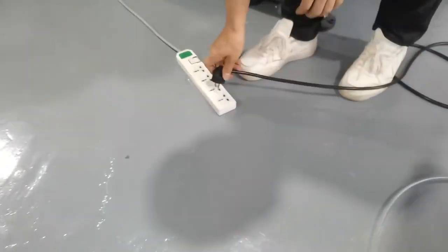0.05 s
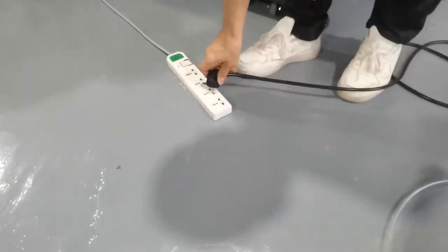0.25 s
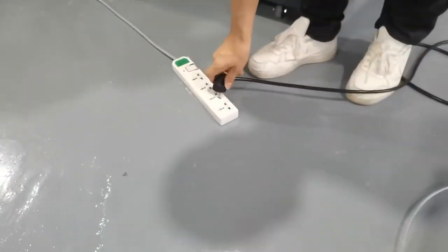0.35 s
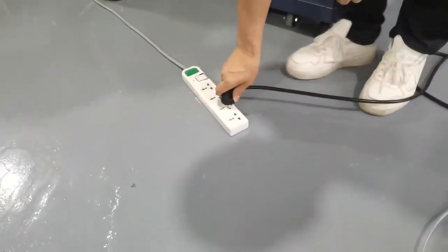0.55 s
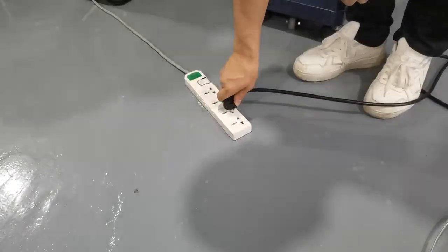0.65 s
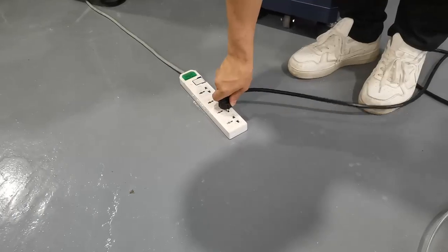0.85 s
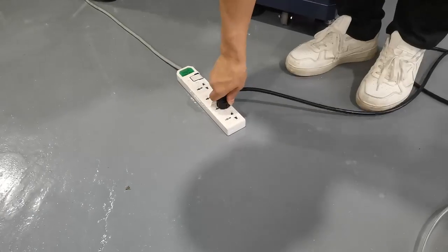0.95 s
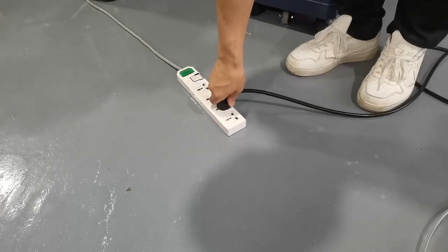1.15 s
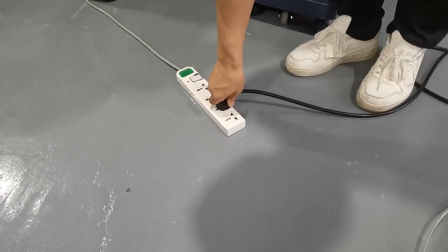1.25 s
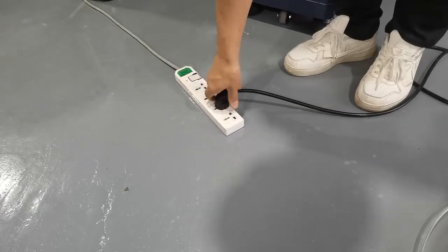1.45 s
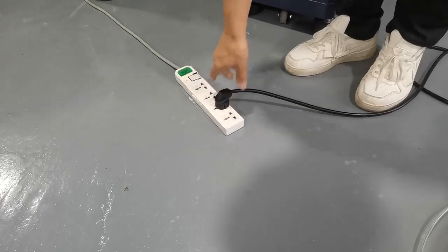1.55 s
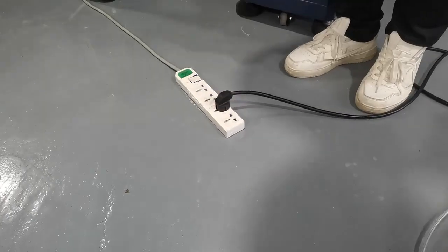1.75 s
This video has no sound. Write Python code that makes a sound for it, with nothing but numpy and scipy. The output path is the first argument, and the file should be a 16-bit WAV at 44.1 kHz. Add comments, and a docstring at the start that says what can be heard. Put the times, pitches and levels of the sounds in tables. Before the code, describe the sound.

A plug scrapes and taps lightly against a plastic power strip, snaps in sharply, slides with a grainy rub, then clicks home with a rattling double snap; close stereo microphone, low rumble and hiss of a large workshop.

```python
"""A large workshop: on its hard floor, a hand pushes a mains plug into a plastic power strip.
Noise makes a low rumble and a faint hiss, and wavering sine tones make a hum.
Plug and cable scuff about as grainy noise, with small taps that are short dying tones.
The pins snap past the shutter, slide in the contacts as grainy noise and snap home: each blow
cracks and rings the plastic case, and the hollow of the strip booms. The hall answers the hits."""
import sys
import numpy as np
from scipy import signal
from scipy.fft import rfft, irfft, next_fast_len
from scipy.io import wavfile
from scipy.ndimage import uniform_filter1d, map_coordinates

SR = 44100
rng = np.random.default_rng(int(sys.argv[2]) if len(sys.argv) > 2 else 0)


def unload_audio(sound):
    """Save the sound as a 16-bit wav file, at the path given as the first command line argument."""
    columns = np.transpose(np.atleast_2d(sound))
    # keep every value between -1 and 1, then stretch to whole-number steps
    steps = np.round(np.clip(columns, -1, 1) * 32767)
    wavfile.write(sys.argv[1], SR, steps.astype(np.int16))


def to_linear_factor(level_db):
    """Convert decibel levels (scalar or array-like) to linear amplitude factors."""
    exponent = np.asarray(level_db, float) / 20
    return 10 ** exponent


N = 79380  # length in samples


def unit(x):
    """Scales x to an rms of 1."""
    return x / np.sqrt(np.mean(x ** 2) + 1e-20)


def along(points, hz):
    """Reads a curve of (Hz, value) points, with frequency on a log axis."""
    point_hz, value = np.transpose(points)
    return np.interp(np.log(hz + 1), np.log(point_hz + 1), value)


def curves(rows):
    """Turns each column after the time into one value per sample."""
    seconds, *columns = np.transpose(rows)
    now = np.arange(N) / SR
    result = []
    for k, column in enumerate(columns):
        # a level that starts after 0 s is silent outside its rows; all else holds its end values
        outside = -120 if k == 0 and seconds[0] > 0 else None
        result.append(np.interp(now, seconds, column, left=outside, right=outside))
    return result


def sides(pan_db):
    """Left and right gains for a left-right difference in dB."""
    return to_linear_factor(np.array([pan_db / 2, -pan_db / 2]))


def wobble(rate):
    """A smooth random curve with this many random knots a second."""
    knots = rng.standard_normal(int(N * rate / SR) + 4)
    return map_coordinates(knots, [np.arange(N) * rate / SR])


def filtered(x, response):
    """Multiplies the spectrum of x by a response of frequency."""
    size = next_fast_len(N + SR // 2)
    return irfft(rfft(x, size) * response(np.fft.rfftfreq(size, 1 / SR)), size)[..., :N]


def below(hz, top_hz):
    """A steep low-pass edge: full up to 120 Hz under the top, nothing above it."""
    return np.clip((top_hz - hz) / 120, 0, 1) ** 2


def rush(gain, alike, patchy_db, grit_db=0.):
    """Stereo noise of rms 1: patches vary it in time and pitch, fast grit makes it grainy."""
    grit = to_linear_factor(grit_db * wobble(900))
    spectrum = signal.stft(grit * rng.standard_normal((2, N)), nperseg=256)[2]
    patches = rng.standard_normal(spectrum.shape[1:])
    patches = uniform_filter1d(patches, size=4, axis=0)
    patches = unit(uniform_filter1d(patches, size=12, axis=1))
    pair = signal.istft(spectrum * to_linear_factor(patchy_db * patches), nperseg=256)[1][:, :N]

    def mid_side_gain(hz):
        # more side and less mid makes left and right less alike
        turn = np.arccos(np.clip(along(alike, hz), -1, 1)) / 2
        return gain(hz) * np.array([np.cos(turn), np.sin(turn)])

    mid, side = filtered(pair, mid_side_gain)
    return unit(np.array([mid + side, mid - side]))


# How the rumble and hum together swell and dip. Each row: time in seconds, level in dB.
RUMBLE_SWELL = [(0, -58.5), (.12, -55.5), (.25, -54.5), (.45, -62), (.56, -56.5), (.72, -54.5),
                (.84, -65.5), (.97, -70.5), (1.06, -55.5), (1.13, -62.5), (1.33, -64.5), (1.42, -58),
                (1.54, -56), (1.72, -53.5), (1.8, -57.5)]
# Tone of the rumble. Each row: frequency in Hz, strength in dB per Hz.
RUMBLE_COLOUR = [(12, -39), (20, -6.5), (80, -7), (112, -6.5), (232, -10), (419, -8.5), (541, -44),
                 (604, -18), (900, -23), (1170, -63), (1980, -120)]
# Tones of the hum. Each row: middle pitch in Hz, middle level in dB over the rumble.
HUM_TONES = [(110, -4), (165, -7), (418, -11), (836, -11)]
# How the hiss swells and dips. Each row: time in seconds, level in dB.
HISS_SWELL = [(0, -59.5), (.1, -55), (.8, -58), (1.5, -55), (1.535, -58), (1.56, -54), (1.6, -58),
              (1.64, -58), (1.675, -51.5), (1.72, -54), (1.755, -58.5), (1.8, -58)]
# Tone of the hiss. Each row: frequency in Hz, strength in dB per Hz.
HISS_COLOUR = [(290, -65), (500, -6), (1430, -9), (2300, -8.5), (4000, -7.5), (7130, -15), (11000, -31),
               (11800, -67), (15100, -61), (22000, -120)]
# How alike left and right are. Each row: frequency in Hz, likeness (1 same, 0 unrelated).
HALL_LIKENESS = [(40, 0.7), (230, 0.75), (860, 0.28), (3270, -0.14), (12400, 0.18)]


def hall_noise():
    """Rumble and hiss are coloured noise; the hum is sine tones wavering in pitch and level."""
    rumble_db, = curves(RUMBLE_SWELL)
    hiss_db, = curves(HISS_SWELL)
    rumble = rush(lambda hz: to_linear_factor(along(RUMBLE_COLOUR, hz)), HALL_LIKENESS, patchy_db=1)
    hum = np.zeros((2, N))
    for hz, db in HUM_TONES:
        waver_db = 2.5 * np.array([wobble(5.93), wobble(6.7)])  # separate for left and right
        pitch_hz = hz * (1 + 0.0118 * wobble(8))
        hum += to_linear_factor(db + waver_db) * np.sin(2 * np.pi * np.cumsum(pitch_hz) / SR)
    hiss = rush(lambda hz: to_linear_factor(along(HISS_COLOUR, hz)), HALL_LIKENESS, patchy_db=1.5)
    return to_linear_factor(rumble_db + 0.46 * wobble(11.83)) * unit(rumble + hum) + to_linear_factor(hiss_db) * hiss


# How the hall's answer dies. Each row: frequency in Hz, time to fall by 60 dB in seconds.
HALL_DECAY = [(300, 0.2), (900, 0.48), (3000, 0.17), (10000, 0.58)]


def hall(x):
    """The hall's answer to a sound: a noise tail in which each frequency dies at its own speed."""
    delay_s, gain_db = 0.0036, -4.5
    hz, t, spectrum = signal.stft(rng.standard_normal((2, SR // 2)), SR, nperseg=256)
    fade = to_linear_factor(-60 * t / along(HALL_DECAY, hz)[:, None])
    tail = signal.istft(spectrum * fade, SR, nperseg=256)[1]
    tail = tail / np.linalg.norm(tail[0])
    late = np.pad(x.mean(axis=0), (round(delay_s * SR), 0))[None]
    return to_linear_factor(gain_db) * signal.fftconvolve(late, tail, axes=1)[:, :N]


# Small taps of plug and cable. Each row: start in seconds, peak in dB before panning, pitch in Hz,
# cycles to fall by 30 dB, left-right difference in dB.
TAP_LIST = [(0.1463, -41.5, 195, 1.14, -25), (.148, -39, 517, 1.03, -22), (.152, -46, 130, 1.1, -12),
            (0.251, -41, 1520, 3, -23), (0.1993, -32.5, 1420, 1.9, -23), (0.208, -47.5, 118, 1.1, -15),
            (.3280, -34.5, 3900, 26, -19), (0.329, -27, 3080, 8.2, -7), (0.3328, -34.5, 3335, 36, -20),
            (.5265, -43, 2370, 4, -3), (.546, -34, 2030, 25, -9), (.5755, -38, 780, 4, 7),
            (0.5559, -36.5, 330, 1.9, 0), (0.555, -42.5, 140, 2, -3), (0.6074, -33, 2640, 7.4, -16),
            (0.609, -35, 3280, 19, -13), (0.6088, -29.5, 1660, 1.9, 6), (0.61, -34.5, 814, 1.8, 12),
            (1.08, -45, 69, 0.48, -22)]


def taps():
    """Each tap is a soft push that swells quickly and then dies away at one pitch."""
    out, t = np.zeros((2, N + SR)), np.arange(SR // 10) / SR
    for start, db, hz, cycles, pan_db in TAP_LIST:
        swell = (1 - np.exp(-1.5 * hz * t)) ** 2
        push = -np.sin(2 * np.pi * hz * t) * to_linear_factor(-30 * hz * t / cycles) * swell
        push = push / np.abs(push).max()
        out[:, round(start * SR):][:, :len(t)] += to_linear_factor(db) * sides(pan_db)[:, None] * push
    return out[:, :N]


# How alike left and right are in rubbing. Each row: frequency in Hz, likeness (1 same, 0 unrelated).
RUB_LIKENESS = [(60, 0.68), (230, 1), (860, 0.21), (3270, 0.27), (12400, 0.13)]


def rubbing(strokes, tone, rings, grit_db, shake_db):
    """Grainy friction noise that follows the strokes and excites a few resonances."""
    level_db, pan_db = curves(strokes)

    def gain(hz):
        peaks = sum(to_linear_factor(db) / (1 + ((hz - centre) / width) ** 2) for centre, width, db in rings)
        return to_linear_factor(along(tone, hz)) * (1 + peaks)

    noise = rush(gain, RUB_LIKENESS, patchy_db=1.5, grit_db=grit_db)
    return to_linear_factor(level_db + shake_db * wobble(30.14)) * sides(pan_db) * noise


# Strokes before the push. Each row: time in seconds, level in dB, left-right difference in dB.
SCUFF_STROKES = [(.05, -68.5, 0), (.09, -52.5, -1), (.17, -52, -10.5), (.2, -49.5, -11),
                 (.255, -46.5, -15.5), (.285, -47, -13), (.31, -43, -7), (.34, -38, -3), (.38, -43, -6),
                 (.44, -44.5, -4.5), (.5, -40, -3.5), (.555, -37.5, -3), (.59, -39, -3.5), (.64, -38, -2.5),
                 (.69, -48, -4.5), (.76, -65, -3)]
# Tone of the scuffing. Each row: frequency in Hz, strength in dB per Hz.
SCUFF_COLOUR = [(88, -33), (150, -23), (208, -9.5), (386, -3.5), (463, -7), (556, -3), (1660, -5),
                (1990, -5.5), (3370, -2), (5810, -6), (6720, -6), (11600, -27.5), (15100, -64),
                (22000, -120)]
# Resonances. Each row: centre in Hz, half-width in Hz, height in dB relative to the tone there.
SCUFF_RESONANCES = [(589, 15, -0.5), (867, 46, -1), (2024, 36, 0.5), (3100, 50, -21)]


def scuffing():
    """Plug and cable rub about before the push, as grainy noise."""
    return rubbing(SCUFF_STROKES, SCUFF_COLOUR, SCUFF_RESONANCES, grit_db=2.1, shake_db=.9)


# Pins in the sprung contacts. Each row: time in seconds, level in dB, left-right difference in dB.
SLIDE_STROKES = [(.830, -68, 0), (.836, -38, -2), (.87, -41, -1), (.93, -43, -.5), (1.0, -44, 0),
                 (1.073, -45, 1), (1.082, -36, 0), (1.1, -36.5, 1), (1.13, -39.5, 1.5), (1.2, -41, 1.5),
                 (1.3, -42, 2.5), (1.34, -44.5, 2.5), (1.4, -49.5, 2), (1.5, -57, 3), (1.65, -73, 2)]
# Tone of the sliding. Each row: frequency in Hz, strength in dB per Hz.
SLIDE_COLOUR = [(88, -62), (150, -34), (164, -32), (526, -23.5), (908, -6.5), (1310, -8.5), (2220, -9),
                (2760, -9), (4930, -7), (5600, -15.5), (6840, -7.5), (8360, -15), (10800, -30),
                (11600, -61), (15100, -60), (22000, -120)]
# Resonances. Each row: centre in Hz, half-width in Hz, height in dB relative to the tone there.
SLIDE_RESONANCES = [(900, 20, 10), (1160, 30, 0), (2850, 150, 0), (3450, 40, 1)]


def sliding():
    """The pins rub in the sprung contacts, as grainy noise with less grit than the scuffing."""
    return rubbing(SLIDE_STROKES, SLIDE_COLOUR, SLIDE_RESONANCES, grit_db=1.0, shake_db=0.94)


# Hollow knocks of the strip, each with its own pitch.
# Each row: start in seconds, gain in dB, pitch in Hz.
HOLLOW_KNOCKS = [(.8322, -23, 915), (.849, -36, 915), (1.0765, -27, 878), (1.078, -32, 704),
                 (1.0885, -33, 885), (1.097, -31, 900)]


def add_knocks(out, t):
    """The hollow of the strip booms after a blow: a sine that rises softly and dies."""
    rise_s, t60_s = .0025, .06
    for start, db, hz in HOLLOW_KNOCKS:
        size = to_linear_factor(db - 60 * t / t60_s) * (1 - np.exp(-t / rise_s))
        out[:, round(start * SR):][:, :len(t)] += size * np.sin(2 * np.pi * hz * t)


# Snaps of the pins, each a short rattle of blows.
# Each row: start in seconds, gain in dB, left-right difference in dB, highest frequency in Hz.
SNAP_BLOWS = [(.8308, -19, -7, 12800), (.83155, -18, -7, 12800), (.8327, -30, -7, 12800),
              (.8345, -34, -3, 12400), (.841, -39, 0, 11900), (.860, -43, -3, 11750),
              (1.0758, -24, -4, 11950), (1.0769, -19, -5, 11950), (1.0791, -19, -3, 11950),
              (1.0806, -25, -4, 11950), (1.0838, -25, -4, 11750), (1.0895, -29, 0, 11750),
              (1.0985, -35, 0, 11750), (1.105, -37, 2, 11750)]
# Ringing modes of the plastic case, before each blow varies them.
# Each row: middle pitch in Hz, middle level in dB, time to fall by 60 dB in seconds.
CASE_MODES = [(1150, -12, .012), (1500, -11, 0.012), (1950, -7, .007), (2240, 1.5, 0.006), (2680, 2, 0.006),
              (3130, 1.5, 0.008), (3500, -5, 0.009), (4350, -1.5, 0.006), (5200, -11, 0.007),
              (6800, -5, 0.007), (7730, -9, 0.006), (9600, -3, 0.005), (10600, -6, 0.006)]


def snaps():
    """Every blow cracks as a noise burst and rings the case anew, then the hollow booms."""
    detune, level_spread_db = .015, 3.6
    crack_db, crack_t60_s = -1, .0035
    lead = SR // 100  # room ahead of the blow for the low-pass filter to ring
    out, t = np.zeros((2, N + SR)), np.arange(SR // 8) / SR
    hz, level_db, t60 = (column[:, None] for column in np.transpose(CASE_MODES))
    for start, db, pan_db, top_hz in SNAP_BLOWS:
        mode_db = level_db + rng.normal(0, level_spread_db, hz.shape)
        size = to_linear_factor(mode_db - 60 * t / t60) * (1 - np.exp(-hz * t))
        mode_hz = hz * (1 + detune * rng.standard_normal(hz.shape))
        # the left starts up to 0.3 cycles ahead in phase (0.3 of a full turn)
        phase = rng.uniform(0, 1, (2,) + hz.shape) * [[[.3]], [[0]]]
        ring = (size * np.sin(2 * np.pi * (mode_hz * t + phase))).sum(axis=1)
        crack = to_linear_factor(crack_db - 60 * t / crack_t60_s) * rng.standard_normal((2, len(t)))
        blow = np.roll(ring + crack, lead, axis=1)
        blow = irfft(rfft(blow) * below(np.fft.rfftfreq(len(t), 1 / SR), top_hz), len(t))
        out[:, round(start * SR) - lead:][:, :len(t)] += to_linear_factor(db) * sides(pan_db)[:, None] * blow
    add_knocks(out, t)

    def colour(f):
        low_cut = (f / 600) ** 2 / (1 + (f / 600) ** 2)
        return low_cut / np.sqrt(1 + (f / 11000) ** 16)

    return filtered(out[:, :N], colour)


def scene():
    """Background, rubbing, and hits in the hall; only the direct snaps reach the highest treble."""
    quiet_top_hz = 11750
    snap, tap = snaps(), taps()
    softer = hall_noise() + hall(snap + tap) + tap + scuffing() + sliding()
    return snap + filtered(softer, lambda hz: below(hz, quiet_top_hz))


# Fixed dips in the tone of the whole sound. Each row: centre in Hz, half-width in Hz, depth 0 to 1.
TONE_DIPS = [(1720, 80, .4), (5620, 260, .6), (8350, 380, .6)]


def tone_dips(hz):
    """The gain of the fixed dips in the tone of the whole sound."""
    gain = np.ones_like(hz)
    for centre, width, depth in TONE_DIPS:
        gain = gain * (1 - np.clip(depth, 0, 1) / (1 + ((hz - centre) / width) ** 2))
    return gain


# The two microphones differ in colour. Each row: frequency in Hz, left-right difference in dB.
MIC_DIFFERENCE = [(500, 2), (1500, 1), (3000, -3), (5000, 0), (7500, 3), (9500, -3), (10500, -14),
                  (12500, -18)]


def microphones(hz):
    """The gains of two microphones that colour left and right differently."""
    return sides(along(MIC_DIFFERENCE, hz))


def band_limit(x):
    """A steep low-pass at the top of the band."""
    return signal.sosfilt(signal.butter(12, 13010, fs=SR, output="sos"), x)


def record(dry):
    """Applies the microphone colour, the fixed dips and a band limit to the whole sound."""
    top_hz = 12800
    mix = filtered(dry, lambda hz: microphones(hz) * tone_dips(hz) * below(hz, top_hz))
    return band_limit(mix)


dry = scene()
out = record(dry)
unload_audio(out)
```